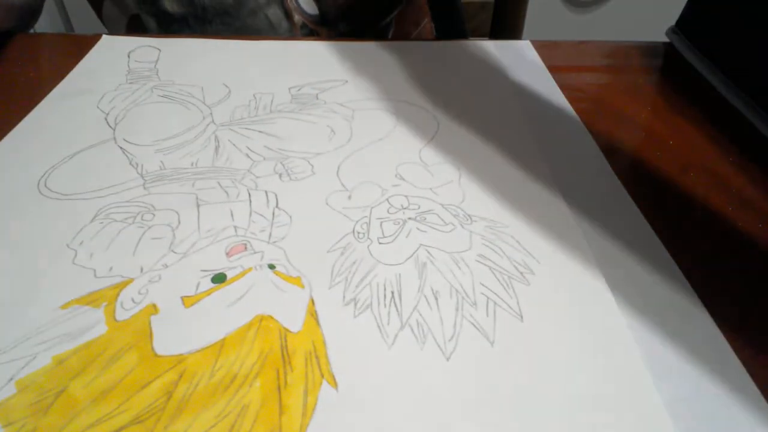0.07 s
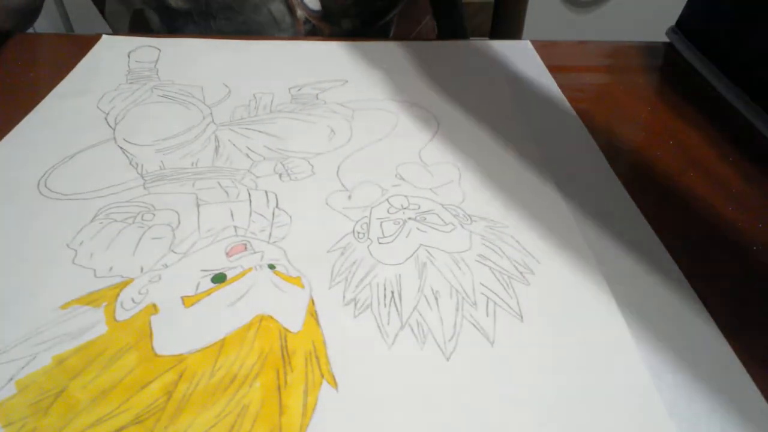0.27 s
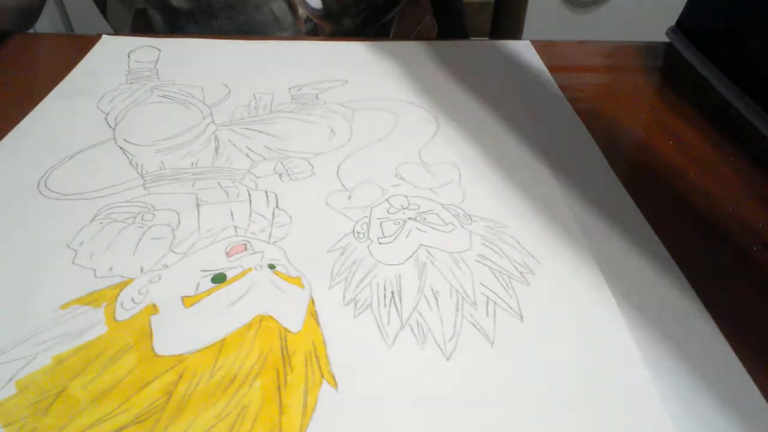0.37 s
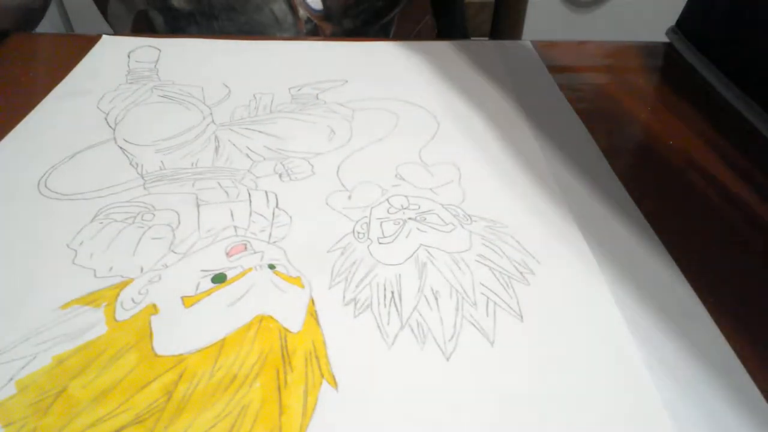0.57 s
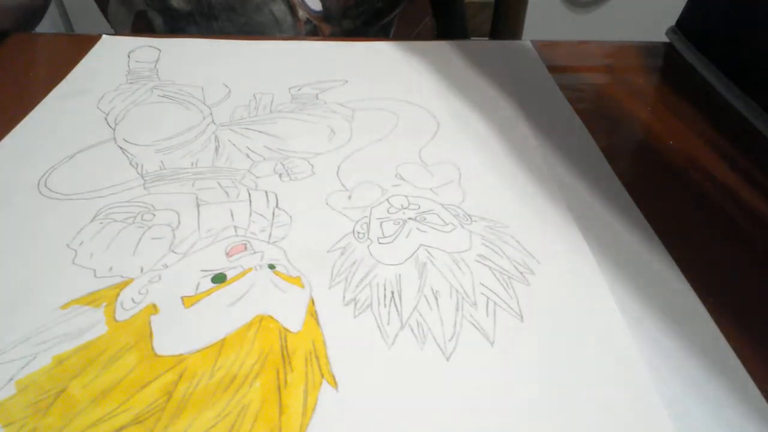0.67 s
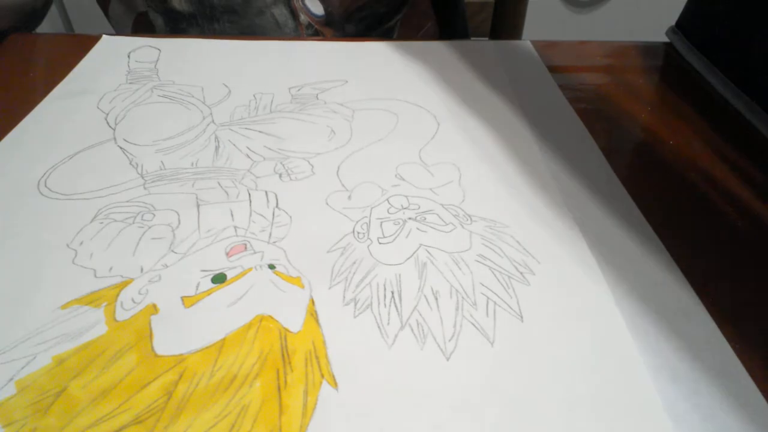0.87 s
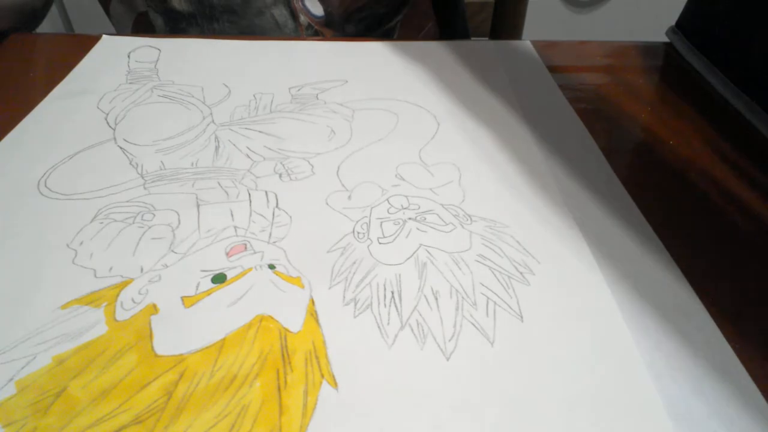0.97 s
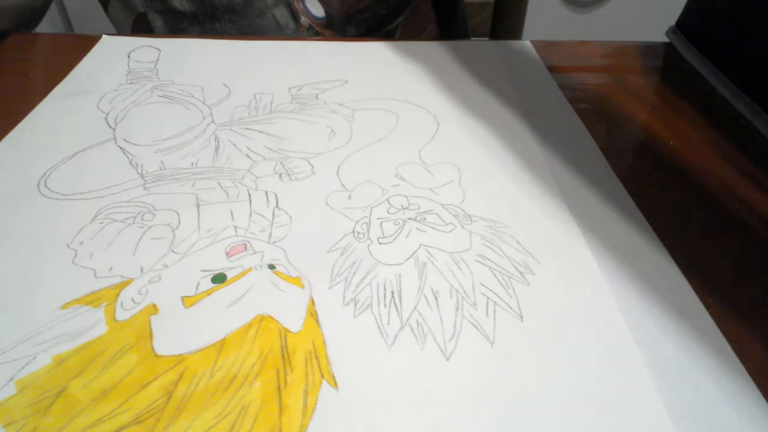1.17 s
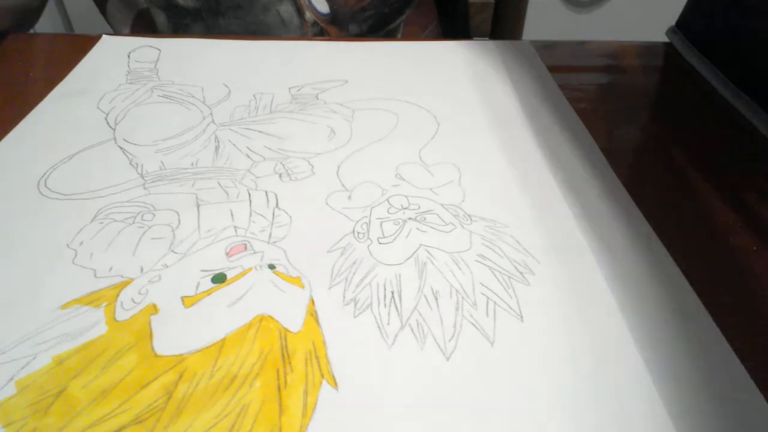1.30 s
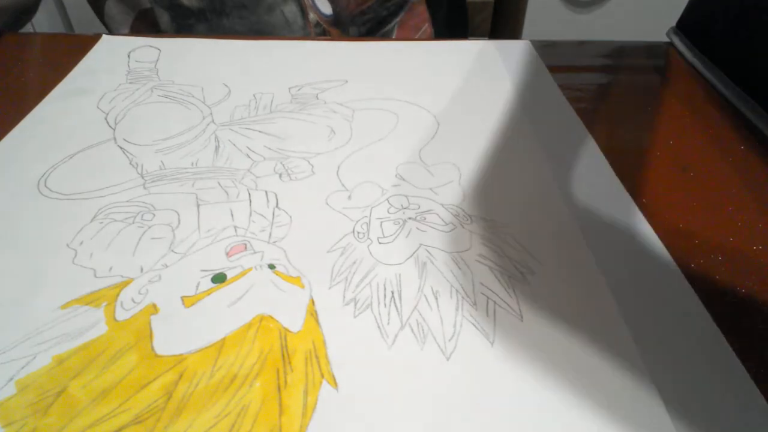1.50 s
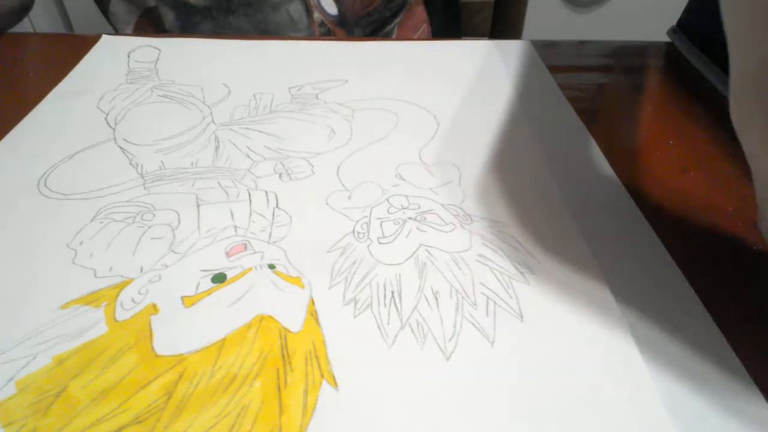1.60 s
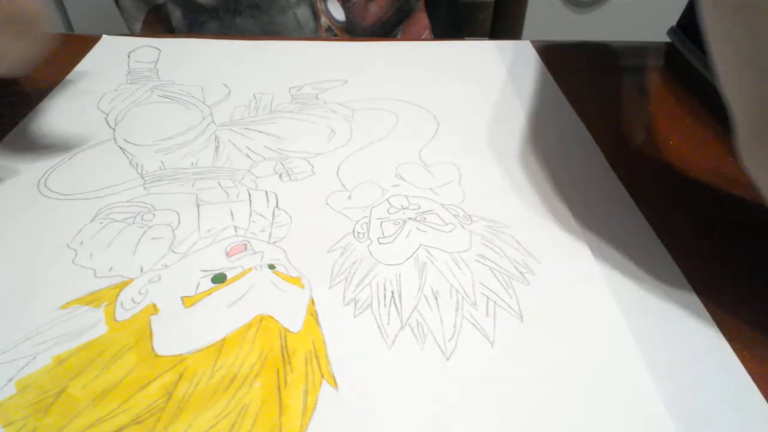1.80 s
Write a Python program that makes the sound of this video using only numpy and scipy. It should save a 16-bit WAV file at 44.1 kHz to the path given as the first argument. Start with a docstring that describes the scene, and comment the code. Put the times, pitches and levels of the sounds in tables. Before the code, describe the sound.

A large sheet of stiff paper is handled on a wooden table, close to the microphone. Faint crinkles lead to crisp pops at 0.2 and 0.35 s, then the strongest hollow buckle at 0.58 s. Smaller pops, ticks and edge scrapes run until about 1.1 s. After near quiet, a sharp crack and hissing shove come at 1.39 s, two softer shoves by 1.6 s, and a small crackle at 1.82 s. Short room reflections, faint hush.

```python
"""Drawing paper shoved on a table

A large sheet of drawing paper is shifted on a wooden table in a small room, close to the microphone.
It buckles with hollow pops: short shaped noise bursts for thump, crack and fizz, with creases crackling on.
Its edge scrapes and ticks, made of tiny slips and single snaps; it shifts once faintly, then in three quick
shoves of dense slips. The room rings briefly over a faint hush; the recorder's noise suppressor shortens the tails."""
import sys
import numpy as np
from scipy import signal
from scipy.fft import rfft, irfft
from scipy.io import wavfile
from scipy.ndimage import uniform_filter1d, map_coordinates

SR = 44100
rng = np.random.default_rng(int(sys.argv[2]) if len(sys.argv) > 2 else 0)


def pcm_store(signal):
    """Save signal as 16-bit PCM."""
    levels = np.round(np.clip(np.atleast_2d(signal), -1, 1) * 32767)
    wavfile.write(sys.argv[1], SR, levels.astype(np.int16).T)


N = 81585  # length in samples


def amp(db):
    """Decibels to gain."""
    return 10 ** (np.asarray(db) / 20)


def read(points, hz):
    """Reads a table on a log-frequency axis."""
    table_hz, value = np.transpose(points)
    return np.interp(np.log(hz + 1), np.log(table_hz + 1), value)


def evened(x):
    """Scales to rms 1."""
    return x / np.sqrt(np.mean(x ** 2) + 1e-20)


def add(mix, start_s, sound):
    """Mixes a sound in at its start time."""
    part = mix[max(round(start_s * SR), 0):][:len(sound)]
    part += sound[:len(part)]


def colour(x, points, size=4096):
    """Causal, minimum-phase filter with the given spectrum."""
    log_gain = np.log(amp(read(points, abs(np.fft.fftfreq(size, 1 / SR)))))
    taps = np.fft.ifft(np.exp(np.conj(signal.hilbert(log_gain)))).real
    return signal.fftconvolve(x, taps[:size // 2])[:len(x)]


def hump(hz, octaves, skirt_db, base):
    """A base spectrum with one resonance, octaves wide, on a flat skirt."""
    f = np.geomspace(50, 16000, 96)
    bell = np.exp(-.5 * (np.log2(f / hz) / octaves) ** 2)
    return np.c_[f, read(base, f) + 20 * np.log10(bell + amp(skirt_db))]


BLOW_S = .005  # every burst carries the energy of this much sound at rms 1


def burst(points, rise_s, decay_s, size=2048, count=1):
    """A quick rattle of fibres: noise evened in spectrum, shaped by rise and decay, then coloured."""
    t = np.arange(size) / SR
    shape = (1 - np.exp(-t / rise_s)) * np.exp(-t / decay_s)
    x = rng.standard_normal(size) * shape
    for _ in range(count):
        z = rfft(x)
        x = irfft(z / (abs(z) + 1e-12))
        # flattening the spectrum smears the envelope, so shape it again
        x *= shape / np.sqrt(abs(uniform_filter1d(x ** 2, size=64)) + 1e-12)
    x = colour(x, points)
    return x * np.sqrt(BLOW_S * SR / np.sum(x ** 2))


# rubbing and reflections come in uneven patches: strength, and spacing in pitch and time
PATCH_DB, PATCH_HZ, PATCH_S = 2.5, 456, 0.017


def patchy(x, size=256):
    """Lets each band swell and sink by chance for a moment."""
    z = signal.stft(x, SR, nperseg=size)[2]
    rows, columns = np.indices(z.shape)
    places = [rows * SR / size / PATCH_HZ, columns * size / 2 / SR / PATCH_S]
    field = map_coordinates(rng.standard_normal((128, 512)), places, order=1, mode="wrap")
    gain = evened(amp(PATCH_DB * evened(field)))
    return signal.istft(z * gain, SR, nperseg=size)[1][:len(x)]


GRAIN_SPREAD_DB = 3  # mean excess of a slip over the smallest, before the limit


def friction(points, per_s):
    """Dense tiny slips of uneven size and random sign, coloured and patchy."""
    size = amp(GRAIN_SPREAD_DB * np.minimum(rng.exponential(1, N), 4))
    slips = size * rng.choice([-1., 1.], N) * (rng.random(N) < per_s / SR)
    return evened(patchy(colour(slips, points)))


# spectrum of the room's hush: freq_hz [Hz], gain_db [dB]
HUSH_SPECTRUM = [(40, -48.5), (112, -34), (150, -1), (240, -5.5), (380, -4), (520, -11.5), (1500, -13),
                 (2800, -11.5), (4500, -12.5), (7000, -11), (9000, -36), (12000, -18.5)]
HUSH_DB = -56.5  # rms level


def room_hush():
    """The steady hush of the room: coloured noise."""
    return amp(HUSH_DB) * evened(colour(rng.standard_normal(N), HUSH_SPECTRUM))


# the sheet buckles, near or far: start_s [s], thump_db [dB], thump_hz [Hz], crack_db [dB], crack_hz [Hz],
# fizz_db [dB], fizz_hz [Hz], room_db [dB], the send to the room
POPS = [(0.001, -40.5, 167, -41, 1150, -40, 3010, 1), (0.041, -75, 195, -36.5, 1420, -46.5, 6570, -4.5),
        (0.215, -22.5, 555, -22, 3000, -28, 5760, -7), (0.2427, -35.5, 650, -35.5, 2560, -28, 4500, -27),
        (0.329, -29, 245, -44, 2930, -25.5, 6630, 2.5),
        (0.3440, -23.5, 302.2, -11.5, 2260, -25.5, 6860, -1.5),
        (0.463, -39.5, 293, -58, 1300, -37.5, 3420, -16), (0.468, -43, 446, -36.5, 2500, -26, 5490, -3),
        (0.515, -44, 540, -41, 2750, -41.5, 6200, -5), (0.58, -9.5, 500, -14, 1200, -17.5, 4120, -3.5),
        (0.659, -31.5, 246, -20, 1830, -24, 4020, -2.5), (0.709, -56, 600, -53, 1800, -48.5, 3630, 4.5),
        (0.7587, -25, 600, -24, 1023, -27.5, 3400, -2.5),
        (0.7948, -34, 640, -41.5, 1150, -38.5, 3376, -7.5), (1.0124, -52.5, 713, -49, 800, -41, 4450, -4),
        (1.35, -73.5, 241, -50, 1145, -35, 3200, -4), (1.3897, -31.5, 307, -14, 1696, -36, 3080, -13),
        (1.425, -26, 700, -25.5, 3000, -35, 7000, -15), (1.5218, -23.5, 780, -27, 1700, -28, 5830, -4),
        (1.5574, -24.5, 587, -23, 1560, -40, 3670, -2.5), (1.689, -49, 616, -48.5, 1700, -49, 3200, -0.5),
        (1.720, -58, 500, -50, 1450, -49.5, 2260, 3), (1.732, -53, 339, -56, 1550, -60.5, 3550, -4),
        (1.823, -32.5, 544, -31, 1500, -29, 3860, -6)]
# base spectrum of the panel's thump: freq_hz [Hz], gain_db [dB]
THUMP_SPECTRUM = [(60, -22), (110, -24), (155, -6), (265, -2), (400, -8.5), (520, 6.5), (660, 3), (770, -8),
                  (920, 1), (1800, -9), (4000, -51.5)]
# base spectrum of the crease's crack: freq_hz [Hz], gain_db [dB]
CRACK_SPECTRUM = [(100, -10.5), (400, 3.5), (3000, -0.5), (4800, -11), (6500, -7.5), (9000, -6)]
# base spectrum of the paper's bright fizz: freq_hz [Hz], gain_db [dB]
FIZZ_SPECTRUM = [(500, -24.5), (2000, -9.5), (3000, -2.5), (4200, -6), (4800, -9), (6200, -3), (7400, -10),
                 (9000, -7), (15000, -8.5)]
THUMP_RISE_S, THUMP_DECAY_S, THUMP_LAG_S = 0.001, 0.0028, 0.00038
THUMP_OCTAVES, THUMP_SKIRT_DB = 0.64, -2.5
CRACK_RISE_S, CRACK_DECAY_S, CRACK_OCTAVES, CRACK_SKIRT_DB = 0.00083, 0.0021, .55, -7.5
CREASE_OCTAVES, CREASE_SKIRT_DB = .07, 4.5  # narrow peak on top of the broad crack
FIZZ_RISE_S, FIZZ_DECAY_S, FIZZ_OCTAVES, FIZZ_SKIRT_DB = 0.0001, 0.0033, 0.049, -9


def pops():
    """Each buckle cracks and fizzes at its crease, then the paper panel thumps; gives direct and room send."""
    direct, sent = np.zeros((2, N))
    for start_s, thump_db, thump_hz, crack_db, crack_hz, fizz_db, fizz_hz, room_db in POPS:
        thump = hump(thump_hz, THUMP_OCTAVES, THUMP_SKIRT_DB, THUMP_SPECTRUM)
        broad_crack = hump(crack_hz, CRACK_OCTAVES, CRACK_SKIRT_DB, CRACK_SPECTRUM)
        crack = hump(crack_hz, CREASE_OCTAVES, CREASE_SKIRT_DB, broad_crack)
        fizz = hump(fizz_hz, FIZZ_OCTAVES, FIZZ_SKIRT_DB, FIZZ_SPECTRUM)
        pop = amp(crack_db) * burst(crack, CRACK_RISE_S, CRACK_DECAY_S)
        pop += amp(fizz_db) * burst(fizz, FIZZ_RISE_S, FIZZ_DECAY_S)
        add(pop, THUMP_LAG_S, amp(thump_db) * burst(thump, THUMP_RISE_S, THUMP_DECAY_S))
        add(direct, start_s, pop)
        add(sent, start_s, amp(room_db) * pop)
    return direct, sent


# the creases crackle on after each buckle
SETTLE_PER_S, SETTLE_S, SETTLE_DB, SETTLE_SPREAD_DB = 390, 0.015, -16.5, 8.5


def settling(buckling):
    """Sparse tiny snaps that follow the strength of each buckle and die away."""
    r = np.exp(-1 / (SETTLE_S * SR))  # smooths the power of the buckling
    strain = np.sqrt(signal.lfilter([1 - r], [1, -r], buckling ** 2))
    size = amp(SETTLE_SPREAD_DB * np.minimum(rng.exponential(1, N), 2))
    snaps = size * (rng.random(N) < SETTLE_PER_S / SR)
    snap = burst(FIZZ_SPECTRUM, rise_s=.0002, decay_s=0.00095)
    crackle = signal.fftconvolve(snaps, snap)[:N]
    return amp(SETTLE_DB) * strain * evened(patchy(crackle))


# diffuse reflections by band: freq_hz [Hz], t60_s [s] before the knee, level_db [dB]
ROOM = [(150, .5, -21), (383, 0.18, -3), (1000, 0.35, -0.5), (2700, 0.26, -2.5), (5000, .31, -4.5),
        (8000, 0.3, -5.5)]
# standing waves between table and walls: freq_hz [Hz], t60_s [s] before the knee, level_db [dB]
ROOM_MODES = [(238.4, 0.27, -63.5), (266, 0.24, -51.5), (514.6, 0.12, -50.5), (850, 0.18, -59),
              (1285, 0.54, -55.5), (1754, 0.14, -55), (2470, 0.067, -47.5)]
ROOM_GAP_S = 0.0021  # the reflections fade in over this time
ROOM_KNEE_S, ROOM_LATE_DB_PER_S = 0.068, 260.5  # extra fall after the knee


def room(x):
    """Diffuse reflections that die band by band, and a few standing waves; the late tail falls faster."""
    t = np.arange(SR // 2) / SR
    hz, age, z = signal.stft(rng.standard_normal(len(t)), SR, nperseg=256)
    table = np.array(ROOM)
    t60 = read(table[:, :2], hz)[:, None]
    level_db = read(table[:, ::2], hz)[:, None]
    decay = np.exp(-np.log(1000) * age / t60)
    even_energy = np.sqrt(2 * np.log(1000) / (t60 * SR))  # long and short decays weigh alike
    z *= amp(level_db) * decay * even_energy
    tail = signal.istft(z, SR, nperseg=256)[1][:len(t)]
    for mode_hz, mode_t60, mode_db in ROOM_MODES:
        wave = np.sin(2 * np.pi * (mode_hz * t + rng.random()))
        tail += amp(mode_db) * np.exp(-np.log(1000) * t / mode_t60) * wave
    tail *= amp(-ROOM_LATE_DB_PER_S * np.maximum(t - ROOM_KNEE_S, 0))
    return signal.fftconvolve(x, tail * np.minimum(t / ROOM_GAP_S, 1) ** 2)[:N]


# the edge scrapes lightly: start_s [s], length_s [s], level_db [dB], pitch_hz [Hz]
SCRAPES = [(0.157, 0.027, -45, 1900), (0.2, 0.016, -42, 1450), (0.312, 0.013, -48, 1130),
           (0.569, 0.0093, -39, 1700), (0.673, 0.023, -48, 2160), (0.754, .008, -34, 2000),
           (0.832, 0.012, -30, 1870), (0.854, 0.07, -41.5, 2080), (0.878, 0.032, -38, 6100),
           (0.922, 0.017, -35, 1320), (0.93, 0.034, -35, 4560), (1.068, 0.032, -49.5, 2100),
           (1.346, 0.03, -49.5, 1418), (1.375, 0.011, -43.5, 1310), (1.647, 0.1, -56.5, 2120)]
# base spectrum of the scraping edge: freq_hz [Hz], gain_db [dB]
SCRAPE_SPECTRUM = [(200, -30.5), (450, -15), (700, -8.5), (1200, 1), (2500, -5.5), (3200, 1.5),
                   (4000, -0.5), (4800, -9.5), (6200, 10), (7500, -1.5), (9000, -4)]
SCRAPE_OCTAVES, SCRAPE_SKIRT_DB = 0.58, -8
EDGE_GRAINS_PER_S = 1600  # the edge catches more coarsely than the flat of the sheet


def scrapes():
    """The edge drags in short strokes that swell and fade, each with its own brightness."""
    t, out = np.arange(N) / SR, np.zeros(N)
    for start_s, length_s, level_db, pitch_hz in SCRAPES:
        speed = np.sin(np.pi * np.clip((t - start_s) / length_s, 0, 1))
        spectrum = hump(pitch_hz, SCRAPE_OCTAVES, SCRAPE_SKIRT_DB, SCRAPE_SPECTRUM)
        out += amp(level_db) * speed * friction(spectrum, EDGE_GRAINS_PER_S)
    return out


# small crinkles: start_s [s], level_db [dB], pitch_hz [Hz]
TICKS = [(0.2032, -38.5, 4350), (0.251, -34.5, 4600), (0.259, -39, 4030), (0.383, -30.5, 4170),
         (0.387, -27, 4440), (0.5652, -36.5, 5140), (0.642, -42, 4000), (0.6811, -32, 3700),
         (0.7656, -29, 7000), (0.771, -26, 5400), (0.858, -29, 3600), (0.887, -22.5, 4530),
         (0.905, -46, 4300), (0.930, -26.5, 4350), (0.941, -31, 3770), (0.9698, -34, 3050),
         (0.987, -36, 3200), (1.08, -44, 3530), (1.1, -45.5, 2870)]
# base spectrum of a crinkle: freq_hz [Hz], gain_db [dB]
TICK_SPECTRUM = [(100, -3.5), (700, -3), (1500, 1.5), (5000, -2), (9000, 11.5)]
TICK_RISE_S, TICK_DECAY_S, TICK_OCTAVES, TICK_SKIRT_DB = .0002, 0.0019, 0.58, -37.5
RING_OCTAVES, RING_SKIRT_DB = .12, 10  # the narrow ring of a small crinkle


def ticks():
    """Small creases snap with no body."""
    out = np.zeros(N)
    for start_s, level_db, pitch_hz in TICKS:
        broad = hump(pitch_hz, TICK_OCTAVES, TICK_SKIRT_DB, TICK_SPECTRUM)
        ringing = hump(pitch_hz, RING_OCTAVES, RING_SKIRT_DB, broad)
        add(out, start_s, amp(level_db) * burst(ringing, TICK_RISE_S, TICK_DECAY_S))
    return out


# the whole sheet shifts or is shoved: start_s [s], length_s [s], hiss_db [dB],
# fade_db_per_s [dB/s], negative swells, flutter_db [dB]
SHOVES = [(0.589, 0.079, -49, 9, -32.5), (1.386, 0.09, -21, 92.5, -26), (1.489, 0.059, -37.5, -44, -53),
          (1.553, 0.047, -29, 70, -41)]
# spectrum of paper hissing over wood: freq_hz [Hz], gain_db [dB]
SLIDE_SPECTRUM = [(150, -25.5), (500, -6), (900, -2), (1600, 6.5), (2300, 1.5), (3300, 3.5), (4500, 3.5),
                  (6200, 2.5), (7500, -1), (9000, -2.5), (11000, -27.5)]
# spectrum of the fluttering sheet: freq_hz [Hz], gain_db [dB]
FLUTTER_SPECTRUM = [(60, -29), (110, -25.5), (160, 2.5), (300, 4), (420, -0.5), (560, -0.5), (800, 7),
                    (1200, -12.5), (3000, -28)]
SHOVE_RISE_S, SHOVE_RELEASE_S, GRAINS_PER_S = 0.003, 0.014, 4400


def shoves():
    """The sheet breaks loose, hisses over the wood and flutters, fading or swelling until it lets go."""
    t, out = np.arange(N) / SR, np.zeros(N)
    hiss = friction(SLIDE_SPECTRUM, GRAINS_PER_S)
    flutter = friction(FLUTTER_SPECTRUM, GRAINS_PER_S)
    for start_s, length_s, hiss_db, fade_db_per_s, flutter_db in SHOVES:
        age = np.maximum(t - start_s, 0)
        speed = (1 - np.exp(-age / SHOVE_RISE_S)) * amp(-fade_db_per_s * np.minimum(age, length_s))
        speed *= np.exp(-np.maximum(age - length_s, 0) / SHOVE_RELEASE_S)
        out += speed * (amp(hiss_db) * hiss + amp(flutter_db) * flutter)
    return out


def scene():
    """Paper sounds, their reflections and the hush of the room."""
    hush = room_hush()
    buckling, sent = pops()
    edge = scrapes() + ticks()
    sliding = shoves()
    wet = patchy(room(sent + amp(-7.0) * edge + amp(-5.5) * sliding))
    return (buckling + settling(buckling) + edge + sliding + wet + hush)[None]


SUPPRESS_BELOW_DB, SUPPRESS_SLOPE, SUPPRESS_DEPTH_DB = -57.5, 0.62, 10.5  # slope: dB cut per dB under
ECHO_BELOW_DB, ECHO_FALL_DB_PER_S = 23, 48  # margin under the recent peak, and how fast that peak sinks


def suppress(x, size=256):
    """Noise suppressor: turns down bands that are quiet or far below their recent peak."""
    _, t, z = signal.stft(x, SR, nperseg=size, noverlap=size * 3 // 4)
    # smooth across bands, then across time
    power = uniform_filter1d(uniform_filter1d(abs(z) ** 2, size=9, axis=1), size=5, axis=2)
    level_db = 10 * np.log10(abs(power) + 1e-14)
    fall_db = ECHO_FALL_DB_PER_S * t
    recent_db = np.maximum.accumulate(level_db + fall_db, axis=2) - fall_db
    under_db = np.maximum(SUPPRESS_BELOW_DB, recent_db - ECHO_BELOW_DB) - level_db
    cut_db = np.clip(under_db * SUPPRESS_SLOPE, 0, SUPPRESS_DEPTH_DB)
    return signal.istft(z * amp(-cut_db), nperseg=size, noverlap=size * 3 // 4)[1][:, :N]


# response of the recorder: freq_hz [Hz], gain_db [dB]; weak bass, steep fall above 7.4 kHz
RECORDER_RESPONSE = [(20, -14.5), (80, -8.5), (110, 0), (145, 4), (7400, -4.5), (7900, -13.5), (8450, -19.5),
                     (9000, -35), (9600, -46), (16000, -48.5)]
CEILING, EDGE_HZ = .9, 16200  # soft limit before the recorder's colour; top of the band


def record(dry):
    """Noise suppressor, soft ceiling, recorder's colour and band limit."""
    heard = suppress(dry)[0]
    limited = heard / (1 + (heard / CEILING) ** 4) ** (1 / 4)
    coloured = colour(limited, RECORDER_RESPONSE)
    lowpass = signal.firwin(511, EDGE_HZ, window=("kaiser", 9), fs=SR)
    return signal.oaconvolve(coloured, lowpass, "same")[None]


dry = scene()
out = record(dry)
pcm_store(out)
```